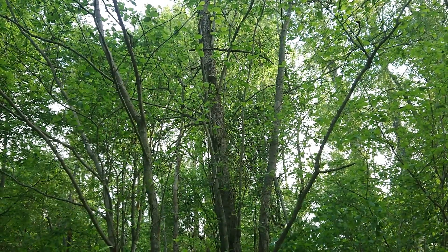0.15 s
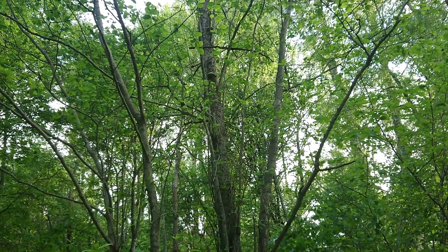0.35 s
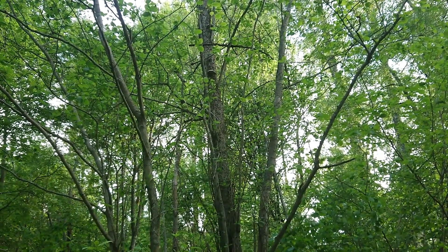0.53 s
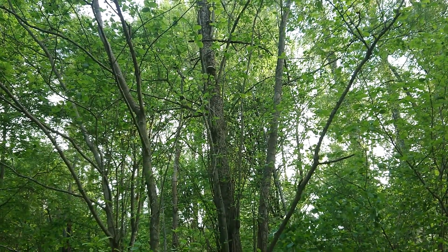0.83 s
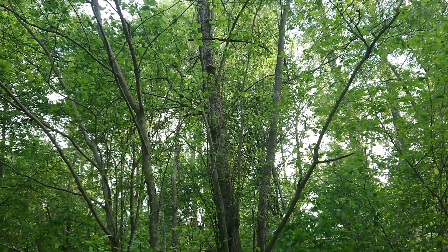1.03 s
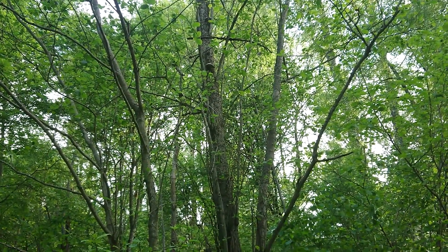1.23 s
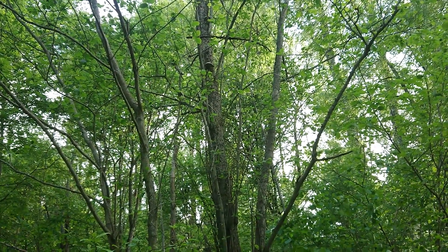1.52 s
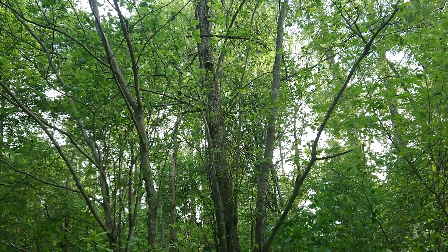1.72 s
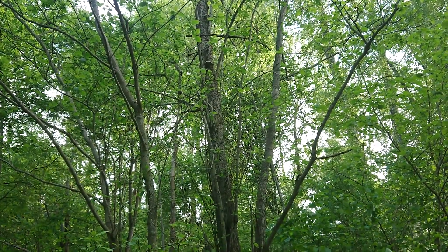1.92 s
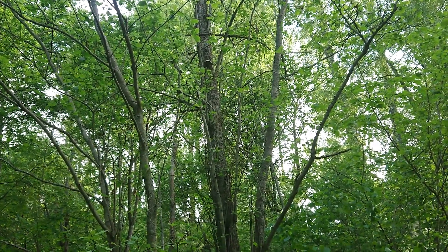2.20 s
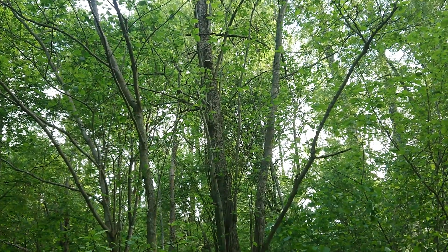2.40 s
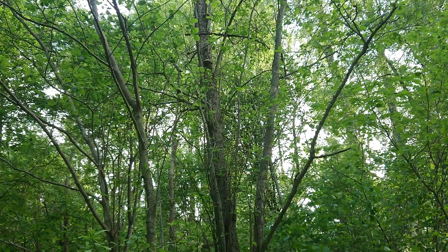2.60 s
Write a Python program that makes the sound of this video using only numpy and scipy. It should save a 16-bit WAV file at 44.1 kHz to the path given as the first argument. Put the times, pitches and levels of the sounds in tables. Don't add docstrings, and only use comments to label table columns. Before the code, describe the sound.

A cuckoo calls its hollow two-note call twice, echoing through a quiet leafy wood

```python
import sys
import numpy as np
from scipy import signal
from scipy.fft import rfft, irfft, next_fast_len
from scipy.io import wavfile
from scipy.ndimage import uniform_filter1d, map_coordinates

SR = 44100
rng = np.random.default_rng(int(sys.argv[2]) if len(sys.argv) > 2 else 0)


def store_pcm(level_fs):
    pcm = np.round(np.clip(level_fs, -1, 1) * 32767).astype(np.int16)
    wavfile.write(sys.argv[1], SR, np.atleast_2d(pcm).T)


def level_to_linear(level):
    exponent = np.asarray(level, float) / 20
    return 10 ** exponent


N = 121275
EARLY = 2 * SR
TOP_HZ = 15750

# t/s, pitch ratio, level/dB, wait for the low note/s, stretch of the low note
CALLS = [
    (-1.35, 1.0, -1, 0.36, 1.01),
    (.22, 1.0, 0.07, .415, 1.007),
    (1.784, 1.0005, 0, .419, 1.06),
]
# t/s within the note, f/Hz, level/dB
HIGH_NOTE = [
    (0, 501.4, -65),
    (.015, 580, -47.5),
    (0.029, 666, -37.5),
    (.046, 700.4, -34.5),
    (.062, 674.6, -32.5),
    (.08, 654.5, -33.5),
    (.099, 626.3, -34.5),
    (.112, 583, -42.5),
    (.12, 550, -68.5),
]
LOW_NOTE = [
    (0, 439, -64.5),
    (0.018, 528.6, -45),
    (.05, 540.6, -36.5),
    (.11, 537.2, -36),
    (0.142, 538.1, -41.5),
    (0.187, 531.2, -38.5),
    (.215, 522, -51.5),
    (.26, 485.7, -53),
    (.29, 468.2, -76),
]
# delay/ms, left level/dB, right level/dB
TRUNK_ECHOES = [(24.7, -24.5, -31), (47.21, -19.5, -10.5), (60.16, -23.5, -15.5), (89, -19, -16),
                (105, -27, -31), (130.2, -32, -18), (161, -39, -24), (205.9, -28, -18), (238.3, -43, -27),
                (281.4, -26, -23), (342, -32, -26), (435.9, -25, -19.5), (520, -31.5, -32)]
# f/Hz, time/s
WOOD_FADE = [(500, 2.86), (2000, 2.5), (4000, 0.84), (8000, 0.63)]
# t/s, length/s, first f/Hz, last f/Hz, level/dB
FAR_SONG = [
    (-.15, 0.22, 2160, 2090, -68),
    (.28, 0.18, 2110, 2076, -80),
    (.6, .14, 2240, 1987, -66),
    (.7, .19, 2007, 1984, -67.5),
    (1.33, .2, 8800, 8000, -83),
    (1.5, .33, 8048, 7940, -79),
]
SWEEPS = [
    (.33, .1, 2300, 1500, -69),
    (.52, .08, 1700, 2400, -69),
    (.795, .075, 8000, 6780, -68),
    (.97, .08, 2900, 3800, -73),
    (1.04, .07, 3800, 3100, -71),
    (1.2, .08, 3000, 4100, -73),
]
NEAR_CHIRPS = [
    (1.19, .075, 2920, 4070, -65.5),
    (2.605, 0.035, 4550, 3750, -73),
]
# t/s, level/dB, push (+) or pull (-)
TAPS = [
    (.0712, -33, -0.87),
    (0.0743, -44, 1),
]
# t/s, level/dB
GUSTS = [(0.0, -68), (0.07, -57), (0.11, -70), (0.14, -61.5), (0.28, -72), (0.39, -66.5), (0.42, -70),
         (0.91, -74), (1.04, -69.5), (1.12, -72.5), (1.16, -61), (1.19, -75.5), (1.52, -70), (1.84, -72),
         (1.95, -65.5), (2.75, -66)]
# f/Hz, level/dB per Hz
WIND_COLOUR = [(25, -43), (45, -14), (70, -1.2), (110, -7.5), (200, -17.5), (400, -20)]
# f/Hz, level/dB per Hz
LEAF_COLOUR = [(150, -14), (300, -10.5), (550, -6.5), (1000, -10), (2500, -17.5), (3600, -16.5),
               (5800, -25.5), (7600, -24.5)]
# f/Hz, likeness (1 = the same)
LEAF_LIKENESS = [(130, 0.67), (290, 0.78), (640, 0.1), (1400, 0.0068)]
# f/Hz, level/dB per Hz
LEFT_MIC_COLOUR = [(13200, -44.5), (13600, -6.5), (15500, 15)]
RIGHT_MIC_COLOUR = [(7000, -29.5), (8400, -8.5), (11000, -5), (15500, -2.4)]


def cuckoo():
    voice = 0
    for start, ratio, db, wait, stretch in CALLS:
        high = (start, HIGH_NOTE, -34.5, 1)  # start, note, octave level in dB, stretch
        low = (start + wait, LOW_NOTE, -28, stretch)
        for note_start, note, octave_db, slow in (high, low):
            t = clock() - note_start
            at, hz, level = np.transpose(note)
            at = slow * at
            pitch = ratio * np.interp(t, at, hz)
            loudness = db + np.interp(t, at, level, -200, -200)
            voice = voice + tone(t, pitch, loudness, octave_db)
    paths = level_to_linear([[-12.5], [-9.5]]) * wood(alike=0.59)
    left_lag_s = 0.00016
    paths[0, round(left_lag_s * SR)] += level_to_linear(-4)
    paths[1, 0] += level_to_linear(-1)
    for ms, left_db, right_db in TRUNK_ECHOES:
        paths[:, round(ms * SR / 1000)] += level_to_linear([left_db, right_db])
    return through(voice, paths)


def songbirds(song, bend, dry_db, wet_db):
    pan_db, rise = -2.6, 0.097
    pitch_waver_hz = 11.3 * wobble(40, extra=EARLY)
    level_waver_db = 5 * wobble(30, extra=EARLY)
    voice = 0
    for start, length, first_hz, last_hz, db in song:
        t = clock() - start
        done = np.clip(t / length, 0, 1)
        glide = (1 - np.exp(-bend * done)) / (1 - np.exp(-bend))
        swell = np.clip(np.minimum(done, 1 - done) / rise, 0, 1)
        pitch = first_hz + (last_hz - first_hz) * glide + pitch_waver_hz
        voice = voice + swell * tone(t, pitch, db + level_waver_db, octave_db=-60)
    paths = level_to_linear(wet_db) * wood(alike=0)
    paths[:, 0] += level_to_linear(dry_db)
    return through(voice, paths) * level_to_linear([[pan_db], [-pan_db]])


def tick():
    ring_hz, fade_s = 790, 0.0033
    t = np.arange(N) / SR
    total = 0
    for start, db, way in TAPS:
        since = t - start
        fade = level_to_linear(db - 60 * np.abs(since) / fade_s)
        total = total + way * fade * np.sin(2 * np.pi * ring_hz * since) * (since > 0)
    return total


def wind_bumps():
    t, db = np.transpose(GUSTS)
    lumps = level_to_linear(1.75 * np.array([wobble(8.63), wobble(9.19)]))
    noise = rng.standard_normal((2, N))
    noise = noise + 0.1 * noise[::-1]
    air = unit(lumps * filtered(noise, lambda hz: closed(WIND_COLOUR, hz)))
    strength = level_to_linear(np.interp(np.arange(N) / SR, t, db))
    return strength * level_to_linear([[-10.5], [6]]) * air


def leaves():
    level_db, pan_db, top_hz = -60, -1.35, 8120
    z = signal.stft(rng.standard_normal((2, N)), nperseg=512)[2]
    patches = uniform_filter1d(rng.standard_normal(z.shape[1:]), 6, 0)
    patches = uniform_filter1d(patches, 14, 1)
    z = z * level_to_linear(0.85 * patches / patches.std())
    pair = signal.istft(z, nperseg=512)[1][:, :N]

    def middle_and_side(hz):
        angle = np.arccos(np.clip(along(LEAF_LIKENESS, hz), -1, 1)) / 2
        colour = closed(LEAF_COLOUR, hz) * (hz < top_hz)
        return colour * [np.cos(angle), np.sin(angle)]

    mid, side = filtered(pair, middle_and_side)
    hiss = unit(np.array([mid + side, mid - side]))
    return level_to_linear(level_db + 0.4 * wobble(2.82)) * level_to_linear([[pan_db], [-pan_db]]) * hiss


def microphone_noise():
    def colours(hz):
        return [closed(LEFT_MIC_COLOUR, hz), closed(RIGHT_MIC_COLOUR, hz)] * (hz < TOP_HZ)

    return level_to_linear([[-82], [-73.5]]) * unit(filtered(rng.standard_normal((2, N)), colours))


def wood(alike):
    rise_s = 0.017
    left, other = rng.standard_normal((2, 3 * SR))
    alike = np.clip(alike, 0, 1)
    right = alike * left + np.sqrt(1 - alike ** 2) * other
    hz, t, z = signal.stft([left, right], SR, nperseg=256)
    fade = level_to_linear(-60 * t / along(WOOD_FADE, hz)[:, None])
    shape = fade * (1 - np.exp(-t / rise_s))
    z = z * shape / np.sqrt(np.sum(shape ** 2, axis=1, keepdims=True) * 128)
    return signal.istft(z, SR, nperseg=256)[1][:, :3 * SR]


def through(x, paths):
    return signal.fftconvolve(x[None], paths, axes=1)[:, EARLY:EARLY + N]


def tone(t, hz, db, octave_db):
    turn = 2 * np.pi * np.cumsum(hz * (t >= 0)) / SR
    wave = np.sin(turn) + level_to_linear(octave_db) * np.sin(2 * turn)
    return np.sqrt(2) * level_to_linear(db) * wave


def clock():
    return np.arange(-EARLY, N) / SR


def wobble(rate, extra=0):
    knots = rng.standard_normal(int((N + extra) * rate / SR) + 4)
    return map_coordinates(knots, [np.arange(N + extra) * rate / SR])


def filtered(x, response):
    m = next_fast_len(N + 8192)
    return irfft(rfft(x, m) * response(np.fft.rfftfreq(m, 1 / SR)), m)[..., :N]


def along(points, hz):
    f, v = np.transpose(points)
    return np.interp(np.log(hz + 1), np.log(f + 1), v)


def closed(points, hz):
    low, high = points[0][0] / 2, points[-1][0] * 2
    return level_to_linear(along([(low, -120), *points, (high, -120)], hz))


def unit(x):
    return x / np.sqrt(np.mean(x ** 2, axis=-1, keepdims=True) + 1e-20)


def scene():
    birds = songbirds(FAR_SONG, bend=3.6, dry_db=-10, wet_db=0)
    birds = birds + songbirds(SWEEPS, bend=1.5, dry_db=-15, wet_db=0)
    birds = birds + songbirds(NEAR_CHIRPS, bend=0.74, dry_db=0.5, wet_db=1.5)
    return cuckoo() + birds + tick() + wind_bumps() + leaves()


def low_pass(x):
    return signal.sosfilt(signal.butter(12, 15900, fs=SR, output="sos"), x)


def record(dry):
    mix = filtered(dry + microphone_noise(), lambda hz: hz < TOP_HZ)
    return low_pass(mix)


dry = scene()
out = record(dry)
store_pcm(out)
```